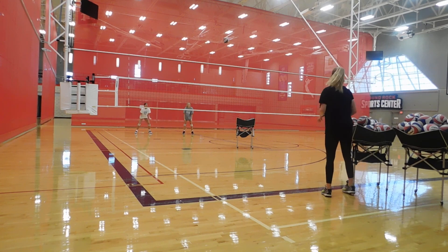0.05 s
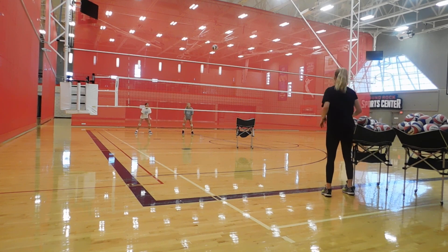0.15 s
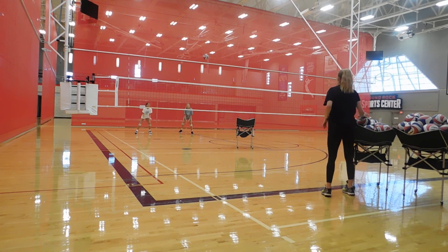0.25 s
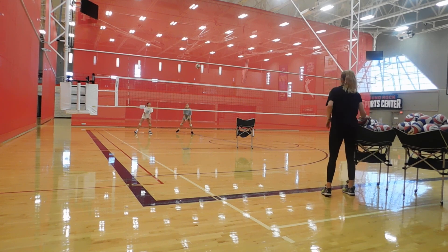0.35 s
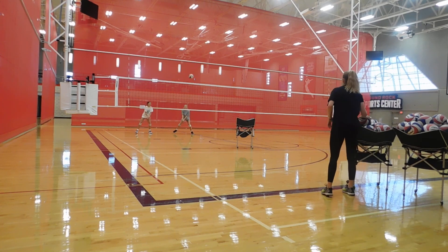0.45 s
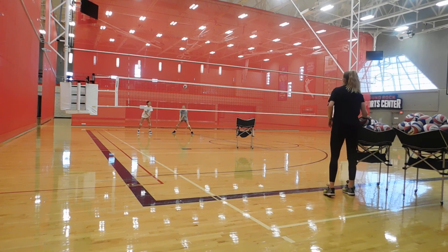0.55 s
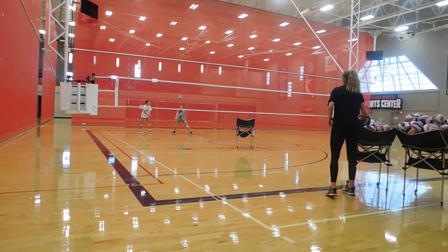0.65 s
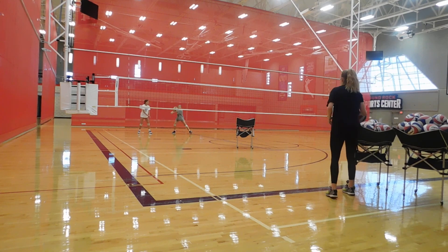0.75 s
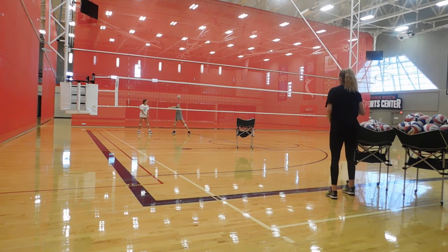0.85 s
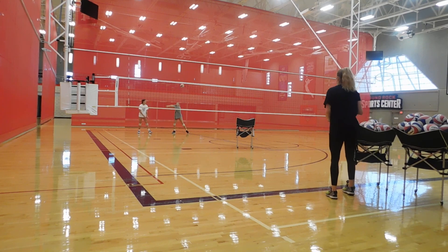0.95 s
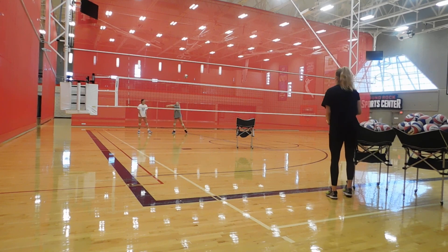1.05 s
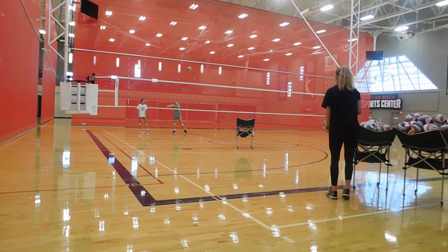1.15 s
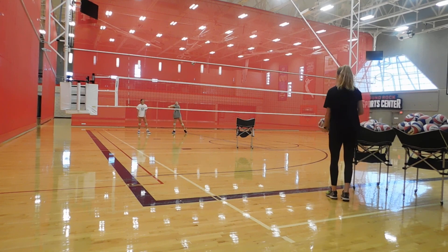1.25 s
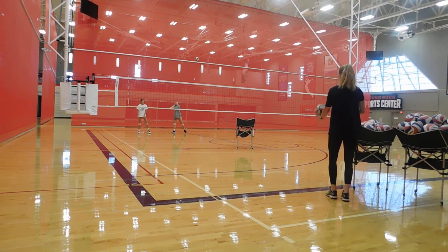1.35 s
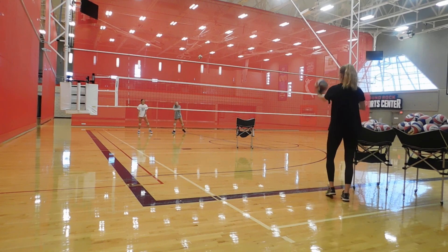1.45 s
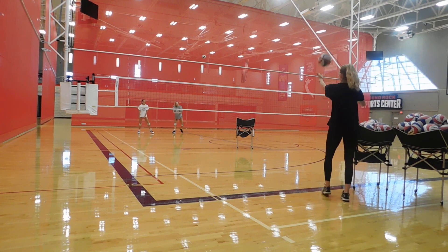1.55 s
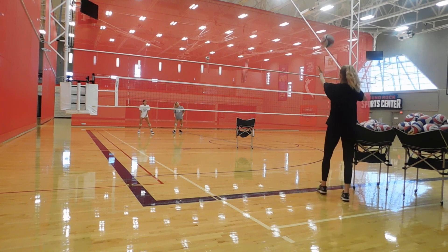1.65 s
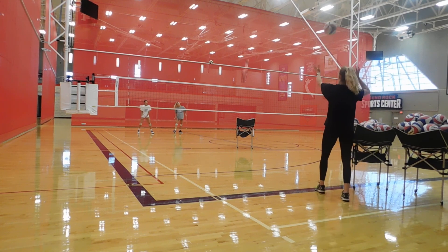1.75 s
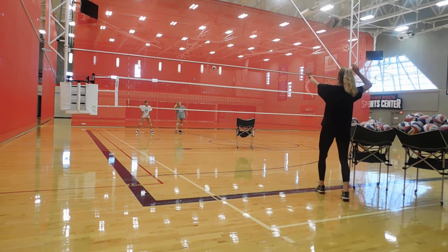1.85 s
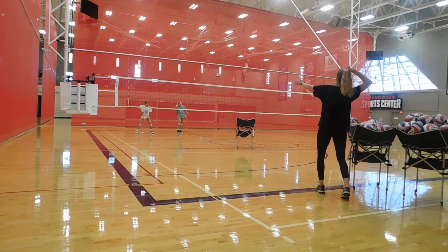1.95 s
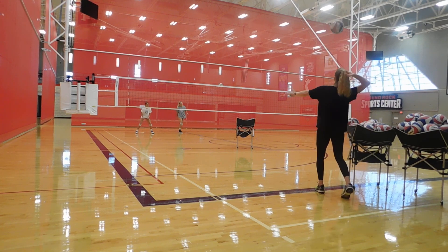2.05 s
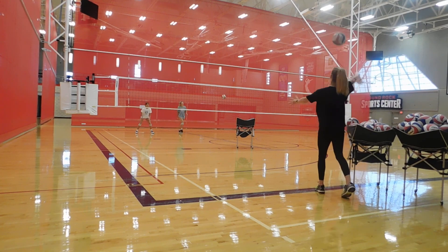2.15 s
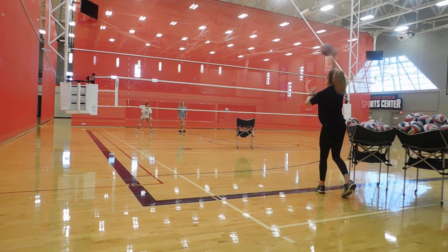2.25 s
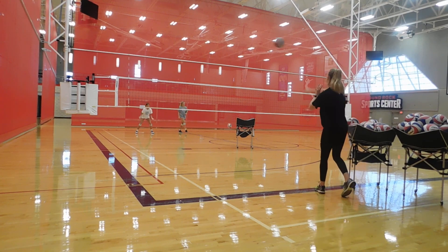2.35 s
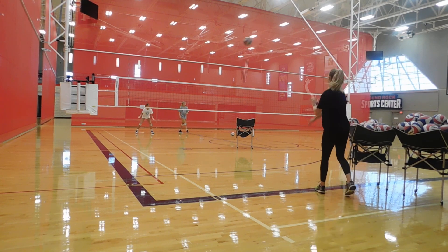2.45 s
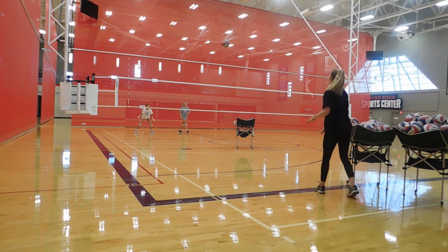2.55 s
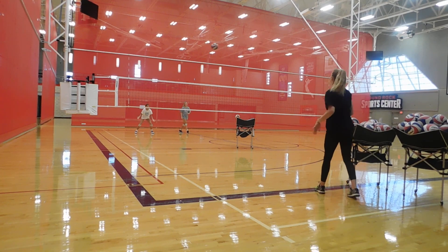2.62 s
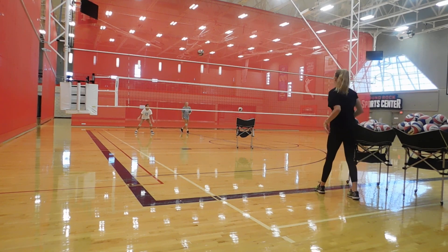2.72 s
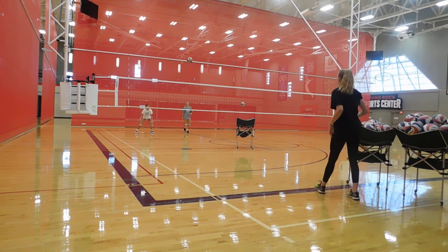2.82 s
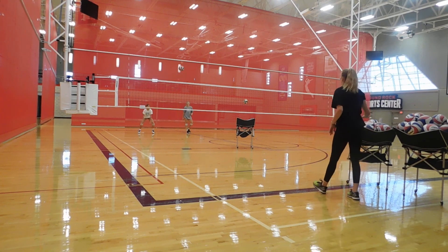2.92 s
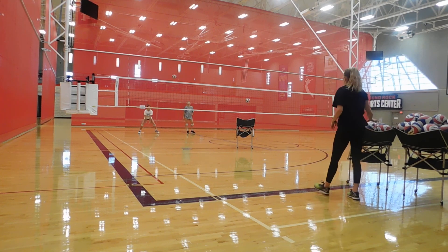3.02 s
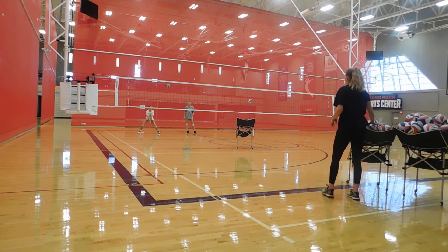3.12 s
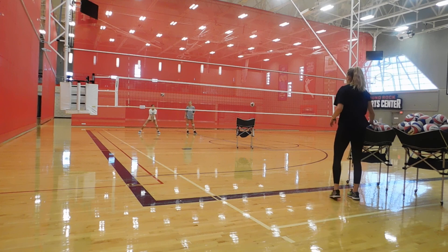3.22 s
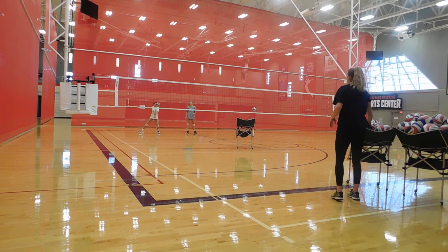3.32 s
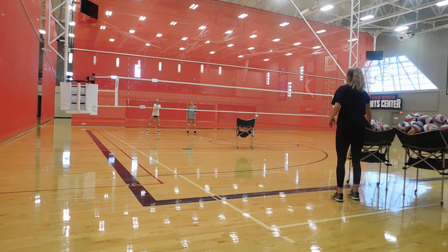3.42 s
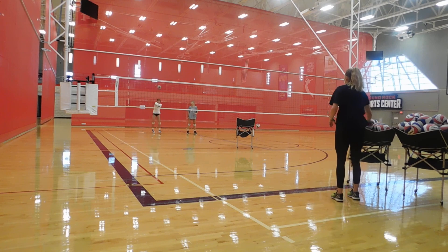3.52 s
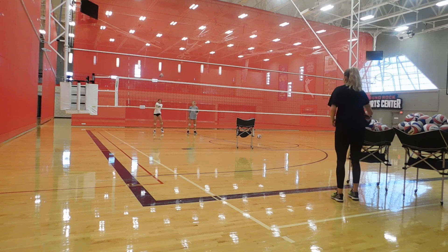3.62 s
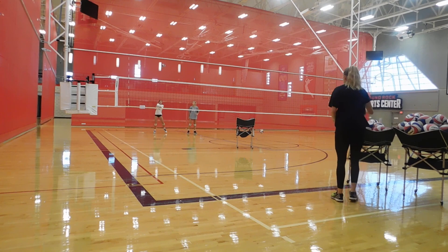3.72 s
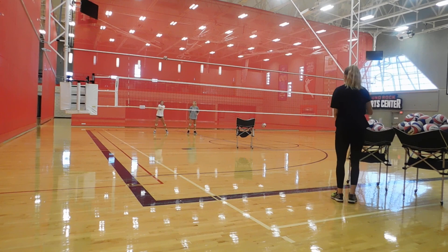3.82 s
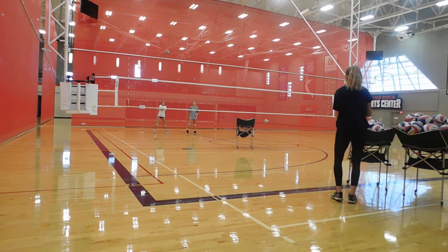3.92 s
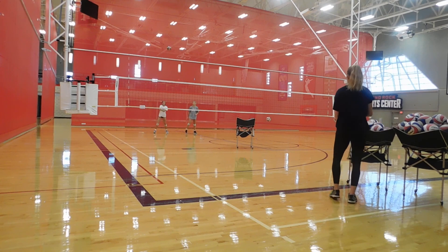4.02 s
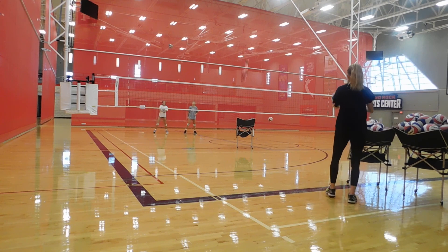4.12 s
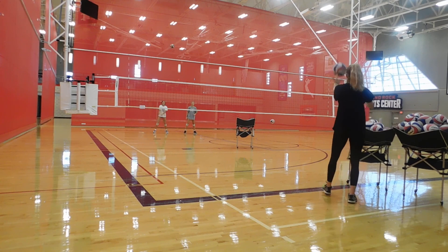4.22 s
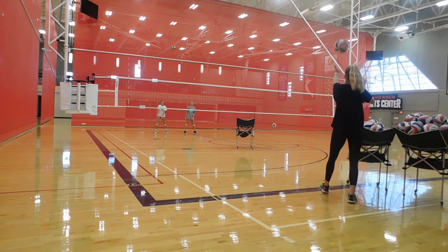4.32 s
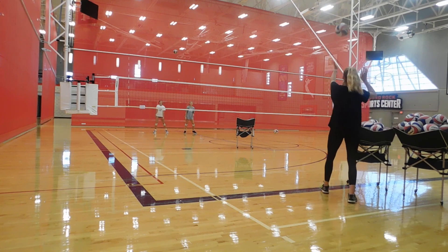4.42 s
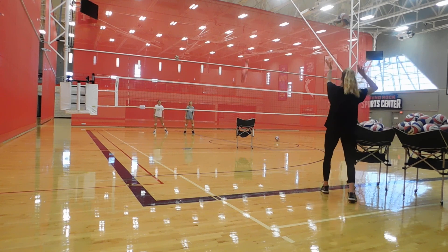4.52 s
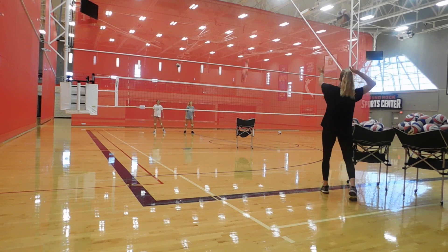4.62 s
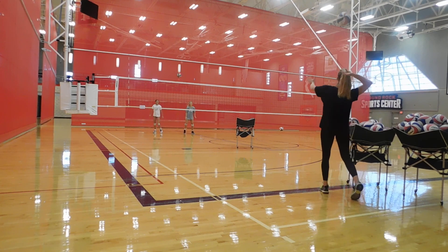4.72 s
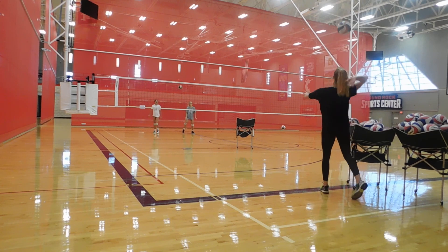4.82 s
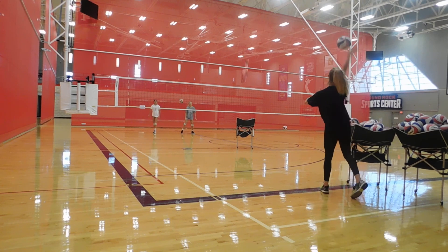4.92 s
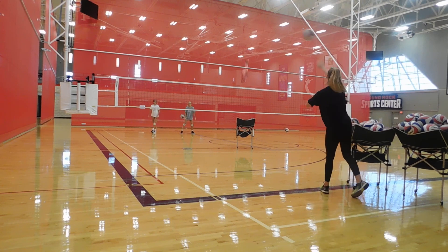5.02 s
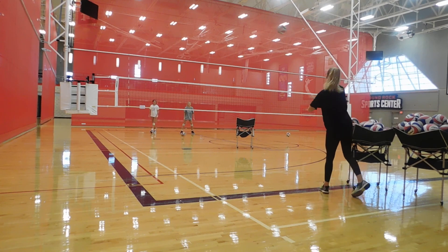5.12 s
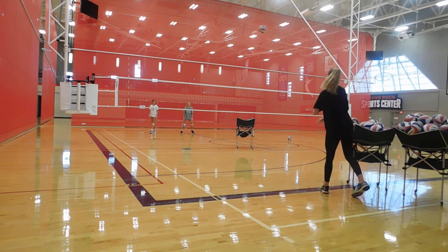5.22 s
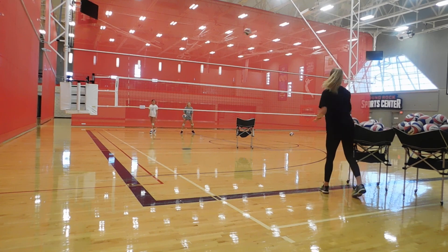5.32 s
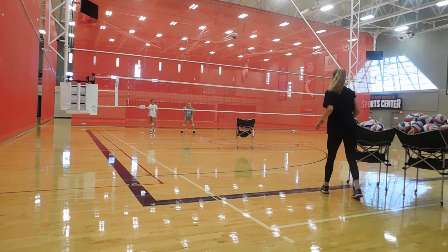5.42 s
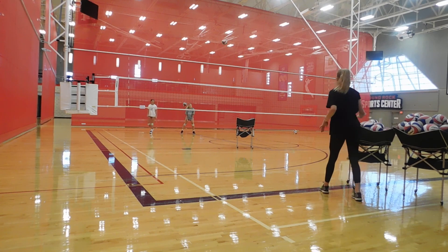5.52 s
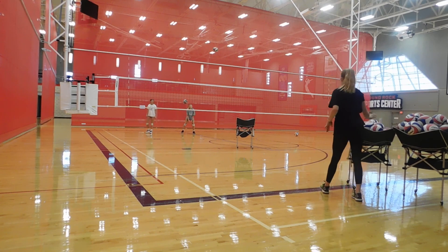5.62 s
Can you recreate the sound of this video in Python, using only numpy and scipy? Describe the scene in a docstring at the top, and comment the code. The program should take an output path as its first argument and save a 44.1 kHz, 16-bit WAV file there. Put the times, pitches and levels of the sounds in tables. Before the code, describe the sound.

A large gym rumbles softly with steady ventilation, and the echo of an earlier bounce is fading at the start. At about 0.8 seconds a distant forearm pass smacks a volleyball, slightly left and very reverberant. Very faint shoe and sleeve scuffs come near 1.3 and 3.3 seconds. A light, drier double tap on a ball sounds to the left at 1.8. At 2.3 a close overhand serve, toward the right, cracks with a low thump and a short hollow ping, and a ball smacks the hardwood at mid court at 2.5. A second far pass snaps at 3.5, followed by a bounce at 3.7 and a softer one at 4.6. The second close serve lands harder at 5.0, with a final ringing bounce at 5.2. The hits echo off the walls and linger for about three seconds.

```python
"""Volleyball practice in a large gym

A near player serves twice, far players pass, loose balls bounce on the hardwood or are tapped.
Each blow is a pressure spike, a smack of the skin, a low thump, a knock and the ping of the air
inside the ball, followed by a floor reflection, a wall echo and the long wash of the hall.
Shoes and sleeves scuff softly, and ventilation rumbles underneath."""
import sys
import numpy as np
from scipy import signal
from scipy.fft import rfft, irfft, next_fast_len
from scipy.io import wavfile

SR = 44100
rng = np.random.default_rng(int(sys.argv[2]) if len(sys.argv) > 2 else 0)


def inscribe(sig):
    """Save sig as 16-bit PCM at rate SR to the path in sys.argv[1].

    A 1-D sig is mono; a 2-D sig holds one channel per row.
    Samples are clipped to [-1, 1] before scaling.
    """
    pcm = np.round(np.clip(np.atleast_2d(sig).T, -1, 1) * 32767)
    wavfile.write(sys.argv[1], SR, pcm.astype(np.int16))


N = 249942
LEAD = int(.3 * SR)   # pre-roll, in samples
T = np.arange(int(.3 * SR)) / SR   # time axis of one blow, in seconds
BANDS = np.geomspace(170, 17150, 56) - 150   # band centres of diffuse sound, in Hz


def from_db(db):
    """Decibels to gain."""
    return 10 ** (np.asarray(db) / 20)


def at_hz(points, hz):
    """Read a curve on a log-frequency axis."""
    f, value = np.transpose(points)
    return np.interp(np.log(hz), np.log(f), value)


def fade(t, t60):
    """A decay of 60 dB in t60 seconds."""
    return np.exp(-np.log(1000) * t / t60)


def swell(t, rise_s, t60):
    """An envelope of unit energy that builds up and dies away."""
    loss, gain = 2 * np.log(1000) / t60, 1 / rise_s
    energy = SR * (1 / loss - 2 / (loss + gain) + 1 / (loss + 2 * gain))
    return (1 - np.exp(-t * gain)) * fade(t, t60) / np.sqrt(energy)


def butter(x, hz, kind, order=2):
    """Causal Butterworth filter."""
    return signal.sosfilt(signal.butter(order, hz, kind, fs=SR, output="sos"), x)


def later(sound, delay_s):
    """The same sound, delayed."""
    return np.pad(sound, (round(delay_s * SR), 0))[:len(sound)]


def add(track, sound, start_s):
    """Mix a sound into a track that has pre-roll."""
    start = max(LEAD + round(start_s * SR), 0)
    part = sound[..., :track.shape[-1] - start]
    track[..., start:start + part.shape[-1]] += part


def band_window(hz, centre):
    """Weight of one band; neighbours overlap and add up to one."""
    return np.cos(np.pi / 2 * np.interp(hz, BANDS, BANDS != centre)) ** 2


def diffuse(size, shape):
    """Noise from all sides, mono in the bass, wide on top; shape(hz) is each band's gain or envelope."""
    # likeness of left and right: frequency_hz, correlation
    likeness = [(40, 1), (250, 1), (500, 0.93), (1000, 0.75), (2000, 0.42), (4000, -0.25), (9000, -0.019),
                (15000, 0.085)]
    length, mid_side = next_fast_len(size, real=True), 0
    hz = np.arange(length // 2 + 1) * SR / length
    white = rfft(rng.standard_normal((2, length)))
    for centre in BANDS:
        alike = np.clip(at_hz(likeness, centre), -.99, .99)
        weight = np.sqrt([[1 + alike], [1 - alike]]) * band_window(hz, centre)
        mid_side = mid_side + shape(centre) * irfft(white * weight, length)[:, :size]
    mid, side = mid_side
    return np.array([mid + side, mid - side]) / np.sqrt(2)


def ventilation(level_db=-46):
    """Steady rumble and hiss of air handlers, spread by the hall."""
    # colour of the moving air: frequency_hz, relative_density_db
    colour = [(13, -23), (22, -3.5), (45, -9.5), (70, -10), (132, -15), (278, -17.5), (310, -20.5),
              (602, -22.5), (910, -22.5), (1040, -20), (1130, -24), (1910, -23.5), (3710, -32.5),
              (12500, -50.5), (16000, -55)]
    air = diffuse(next_fast_len(N), lambda hz: from_db(at_hz(colour, hz)))[:, :N]
    return from_db(level_db) * air / np.std(air)


def scuffs():
    """The near player shifts stance and swings an arm: brief soft hisses."""
    # rubs of shoes and sleeves: peak_s, relative_db, width_s
    rubs = [(1.25, -65, .015), (1.385, -65.5, 0.0037), (3.29, -67.5, .035)]
    t = np.arange(N) / SR
    envelope = sum(from_db(db) * np.exp(-.5 * ((t - peak_s) / width_s) ** 2) for peak_s, db, width_s in rubs)
    return 2 * envelope * butter(rng.standard_normal((2, N)), [6500, 14000], "band")


def bunching(size, depth_db, width_s):
    """Reflections bunch up at random: a flickering gain of mean power one."""
    knots = np.arange(size) / SR / width_s
    gain = from_db(depth_db * np.interp(knots, np.arange(4096), rng.standard_normal(4096)))
    return gain / np.sqrt(np.mean(gain ** 2))


def hall(blows):
    """The hall stores each blow's energy by band: first reflections die quickly, the wash hangs on."""
    # colour of the first reflections: frequency_hz, level_db
    first_colour = [(60, -33), (100, -5.5), (170, 1), (300, -4), (500, -4), (1000, 4.5), (2000, 2),
                    (4000, 2), (9000, -5), (15000, -3.5)]
    # colour of the long wash: frequency_hz, level_db
    wash_colour = [(60, -3.5), (150, 0), (260, -3), (500, -0.5), (750, -0.5), (950, 0.5), (1130, 1.5),
                   (1430, 6.5), (1750, 0.5), (3200, 4.5), (4200, 2), (5500, 2), (9000, -1.5),
                   (15000, -12.5)]
    # decay of the wash: frequency_hz, t60_s
    wash_decay = [(60, 1.9), (160, 5.2), (420, 3.04), (1100, 2.6), (2900, 2.86), (5000, 1.9), (8000, 1.1),
                  (15000, 0.86)]
    t = np.arange(-LEAD, N, 32) / SR   # coarse clock for the envelopes
    hz = np.arange(len(T) // 2 + 1) * SR / len(T)
    spectra = [np.abs(rfft(sound)) ** 2 for _, sound, _, _ in blows]

    def envelope(centre):
        window, power = band_window(hz, centre), 0
        for (start_s, _, send_db, place), spectrum in zip(blows, spectra):
            age = np.maximum(t - start_s, 0)
            first_db = send_db + place["first_db"] + at_hz(first_colour, centre)
            wash_db = send_db + place["wash_db"] + at_hz(wash_colour, centre)
            first = from_db(first_db) * swell(age, rise_s=.014, t60=.52)
            wash = from_db(wash_db) * swell(age, rise_s=.05, t60=at_hz(wash_decay, centre))
            power = power + np.average(spectrum, weights=window) * (first ** 2 + wash ** 2)
        return np.interp(np.arange(N) / SR, t, np.sqrt(power))
    return diffuse(N, envelope) * bunching(N, depth_db=1, width_s=.004)


def smear(sound, noise, rise_s, t60, band_hz):
    """A cluster of small reflections smears a sound in time and trims its lows and highs."""
    size = noise.shape[1]
    cluster = noise * bunching(size, depth_db=5, width_s=.0002) * swell(T[:size], rise_s, t60)
    cluster /= np.sqrt(np.sum(cluster ** 2) / 2)
    smeared = signal.fftconvolve(sound[None], cluster, axes=1)[:, :len(sound)]
    return butter(smeared, band_hz, "band", order=1)


def arrive(sound, bearing):
    """The nearer side hears a sound up to two samples sooner; bearing runs from -1 left to 1 right."""
    n = np.arange(len(sound))
    return np.array([np.interp(n - lag, n, sound, left=0) for lag in (bearing, -bearing)])


def early_paths(blows, floor_delay_s=.0026, roof_delay_s=.039, roof_db=-7, cluster_samples=2048):
    """Every blow arrives directly, off the floor, off things nearby, off a wall and off the roof."""
    track, count = np.zeros((2, LEAD + N)), 2 * len(blows)
    noises = np.split(diffuse(cluster_samples * count, lambda hz: 1), count, axis=1)
    for (start_s, sound, _, place), nearby, wall in zip(blows, noises[::2], noises[1::2]):
        direct = arrive(np.pad(sound, (2, 0)), place["bearing"])
        floor = arrive(sound, -place["bearing"])
        scatter = smear(sound, nearby, rise_s=.00045, t60=.092, band_hz=[350, 11000])
        echo = smear(sound, wall, rise_s=.0002, t60=.012, band_hz=[1300, 14000])
        roof = butter(sound, 280, "low")   # the trusses mirror only the bass
        add(track, direct, start_s)
        add(track, from_db(place["floor_db"]) * floor, start_s + floor_delay_s)
        add(track, from_db(place["scatter_db"]) * scatter, start_s)
        add(track, from_db(place["echo_db"]) * echo, start_s + place["echo_s"])
        add(track, from_db(roof_db) * roof, start_s + roof_delay_s)
    return track[:, LEAD:]


def ring(modes, clock):
    """Struck modes dying away; their phase follows the given clock."""
    return sum(from_db(db) * fade(T, t60) * np.sin(2 * np.pi * hz * clock) for hz, db, t60 in modes)


def squash_thump():
    """The low body of a blow: the ball squashes and the floor flexes."""
    # modes of ball and floor: pitch_hz, level_db, t60_s
    modes = [(95.6, -0.5, 0.15), (117.5, 1, 0.097), (153.6, -4, 0.081), (284, -12.5, 0.046)]
    attack = 1 - np.exp(-T / .002)
    return -butter(ring(modes, T) * attack, 37, "high")


def cavity_ping(flat_s, sag=.2604):
    """The flattened ball rings flat and muffled, then freely at its own pitch as it springs back."""
    # modes of the casing and the air inside: pitch_hz, level_db, t60_s
    modes = [(401, -10, 0.046), (483, 6, 0.033), (766, -6, 0.09), (988, -0.5, 0.15), (1322, -6, 0.089),
             (1482, -15.5, 0.24), (1706, 5.5, 0.026), (1800, -7, 0.089), (2440, -17, 0.04),
             (3080, -33, 0.017)]
    release = 1 - np.exp(-(T / flat_s) ** 2)
    sagging_clock = T - sag * flat_s * (1 - np.exp(-T / flat_s))
    return release * ring(modes, sagging_clock)


def casing_tone(hz, cycles):
    """A slapped patch of the casing rings for a few cycles."""
    return fade(T, t60=cycles / hz) * np.sin(2 * np.pi * hz * T)


def skin_rasp(band_hz, t60, order=2):
    """A short rasp of the ball's skin, even in colour across its band."""
    envelope = fade(T, t60)
    rasp = rng.standard_normal(len(T)) * envelope
    whitened = irfft(np.exp(1j * np.angle(rfft(rasp))), len(T)) * fade(T, 4 * t60)
    makeup = np.sqrt(np.sum(envelope ** 2) / np.sum(whitened ** 2))
    return makeup * butter(whitened, band_hz, "band", order)


def ball(hardness_db, ring_db, extra_crack_db, smack_hz, knock_hz, spike_db, edge_hz, smack_db,
         smack_cycles, knock_db, knock_cycles, thump_db, ping_db, contact_s, snap_db, crack_db):
    """One blow: a spike of squeezed-out air, slapped skin, the squash, a rebound knock and the ping."""
    flat_s = contact_s * from_db(-hardness_db)   # harder blows have a shorter contact
    spike = from_db(spike_db) * butter(fade(T, t60=.0013), [edge_hz, 7500], "band", order=1)
    smack = from_db(smack_db) * casing_tone(smack_hz, smack_cycles)
    snap = from_db(snap_db) * later(skin_rasp([2410, 3940], t60=.0073, order=1), delay_s=.0008)
    crack = from_db(crack_db + extra_crack_db) * skin_rasp([7760, 13800], t60=.0099)
    thump = from_db(thump_db) * squash_thump()
    knock = from_db(knock_db) * later(casing_tone(knock_hz, knock_cycles), flat_s)
    ping = from_db(ping_db) * cavity_ping(flat_s)
    slap = spike + smack + snap + crack
    return thump + from_db(hardness_db) * slap + from_db(ring_db) * (knock + ping)


def strike(hits, voice, place):
    """Blows as (start_s, sound, send_db, place); a hit's dB values trim the shared voice and place."""
    return [(start_s, from_db(strength_db) * ball(*touch, **voice), send_db, place)
            for start_s, strength_db, *touch, send_db in hits]


def taps():
    """Light taps on a ball at the sideline: small, short and fairly dry."""
    # taps: start_s, strength_db, hardness_db, ring_db, extra_crack_db, smack_hz, knock_hz, send_db
    hits = [(1.8072, 0.5, 0.5, -1, 4, 2440, 1420, -2), (1.8617, -12.5, 0.5, 10, -12, 2200, 1650, -5)]
    voice = dict(spike_db=-34, edge_hz=840, smack_db=-14, smack_cycles=2.8, knock_db=-36,
                 knock_cycles=14, thump_db=-48, ping_db=-51, contact_s=.0008, snap_db=-30, crack_db=-41)
    sideline = dict(bearing=-.63, floor_db=-12, scatter_db=-2.5, first_db=-4, wash_db=-13,
                    echo_s=.018, echo_db=-20)
    return strike(hits, voice, sideline)


def bounces():
    """Balls smack the hardwood at mid court; the first lands in the pre-roll and leaves only its wash."""
    # landings: start_s, strength_db, hardness_db, ring_db, extra_crack_db, smack_hz, knock_hz, send_db
    hits = [(-0.25, -2.5, -0.5, 6, -5, 1240, 680, 1), (2.5066, 1, 1, 2, -4, 2070, 320, -2),
            (3.7187, -4.5, -2, 6, 1.5, 1630, 870, -0.5), (4.5969, -9.5, -4.5, 2, 6.5, 1970, 1140, -3),
            (5.2149, -1.5, 1.5, 12.5, 2.5, 2050, 714, 1)]
    voice = dict(spike_db=-4, edge_hz=1180, smack_db=-8, smack_cycles=4.95, knock_db=-26.5,
                 knock_cycles=16, thump_db=-23, ping_db=-37.5, contact_s=.00398,
                 snap_db=-20, crack_db=-24.5)
    mid_court = dict(bearing=.055, floor_db=-13, scatter_db=-2, first_db=0, wash_db=0,
                     echo_s=.036, echo_db=-11)
    return strike(hits, voice, mid_court)


def passes():
    """Two far forearm passes, wet with hall; in the second, one arm meets the ball just ahead."""
    # arm hits: start_s, strength_db, hardness_db, ring_db, extra_crack_db, smack_hz, knock_hz, send_db
    hits = [(0.8488, 0.5, -0.5, 3.5, 1.5, 1970, 1480, -0.5), (3.4563, -11, 2.5, 12, 6, 4830, 3170, 4),
            (3.4590, -1.5, 6.5, 0.5, -4, 2390, 1340, -4)]
    voice = dict(spike_db=-9.5, edge_hz=1770, smack_db=-13.5, smack_cycles=6.5, knock_db=-21,
                 knock_cycles=10.8, thump_db=-26.5, ping_db=-38, contact_s=.00306,
                 snap_db=-17, crack_db=-25)
    far_court = dict(bearing=-.37, floor_db=-8, scatter_db=-.5, first_db=5, wash_db=3.5,
                     echo_s=.0108, echo_db=-3.5)
    return strike(hits, voice, far_court)


def serves():
    """Two close overhand serves: the hand flattens the ball with a crack and leaves it pinging."""
    # hand hits: start_s, strength_db, hardness_db, ring_db, extra_crack_db, smack_hz, knock_hz, send_db
    hits = [(2.2878, 1.5, -3.5, -3, -0.5, 1800, 870, 1), (4.9941, 1.5, 2.5, -3.5, -0.5, 1530, 1025, 0.5)]
    voice = dict(spike_db=1.5, edge_hz=440, smack_db=-11.5, smack_cycles=2.5, knock_db=-10.5,
                 knock_cycles=18, thump_db=-22.5, ping_db=-9.5, contact_s=.0098,
                 snap_db=-36, crack_db=-11)
    service_line = dict(bearing=.9, floor_db=-6.5, scatter_db=-1.5, first_db=-5.5, wash_db=-5.5,
                        echo_s=.0482, echo_db=-6)
    return strike(hits, voice, service_line)


def scene(bass_left_db=1.0, treble_left_db=.13, split_hz=700):
    """Balls, scuffs and ventilation; the bass leans a little left, the treble stays near the centre."""
    blows = serves() + passes() + bounces() + taps()
    mix = early_paths(blows) + hall(blows) + scuffs() + ventilation()
    bass = butter(mix, split_hz, "low", order=1)
    treble = mix - bass
    lean = np.array([[1], [-1]])
    return bass * from_db(lean * bass_left_db) + treble * from_db(lean * treble_left_db)


def record(dry, cutoff_hz=16000):
    """The hardest smacks clip at full scale, and a steep low-pass cuts the top."""
    clipped = np.clip(dry, -1, 1)
    return signal.sosfilt(signal.ellip(10, .1, 90, cutoff_hz, fs=SR, output="sos"), clipped)


dry = scene()
out = record(dry)
inscribe(out)
```